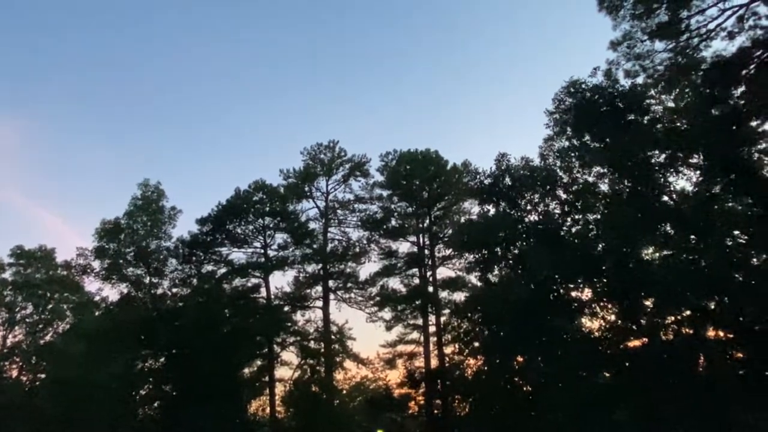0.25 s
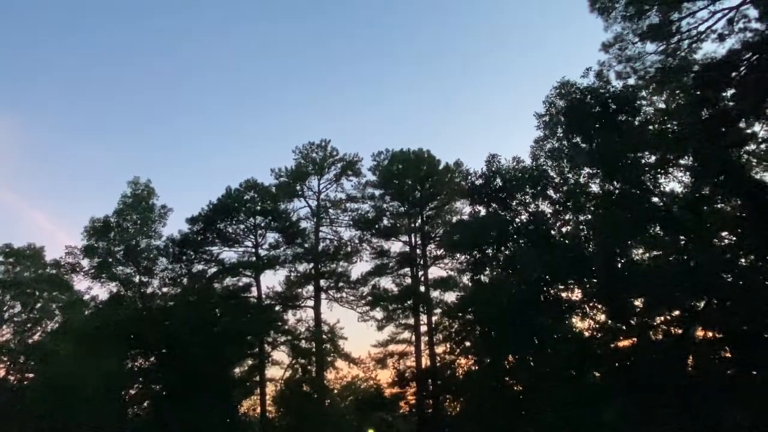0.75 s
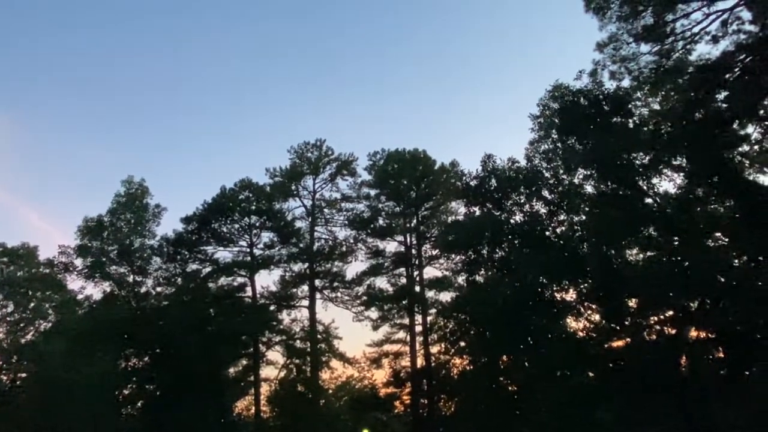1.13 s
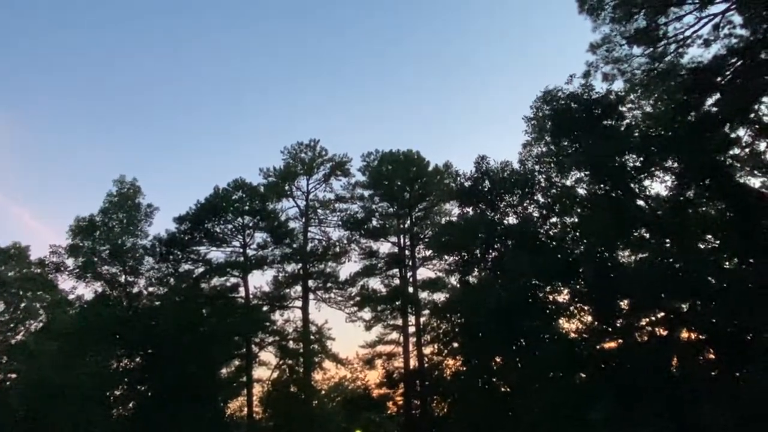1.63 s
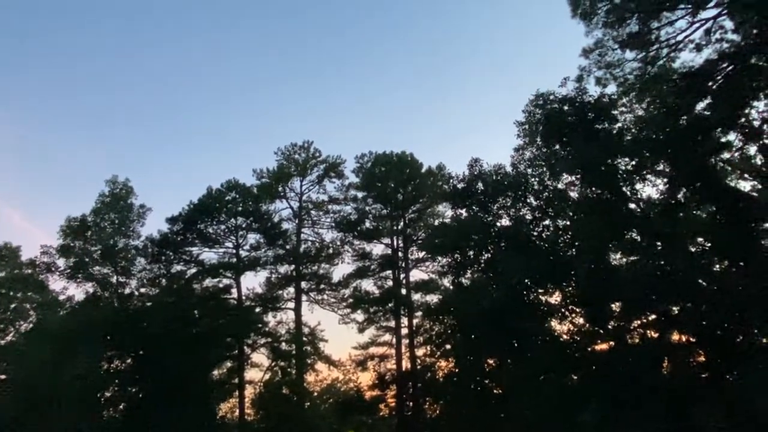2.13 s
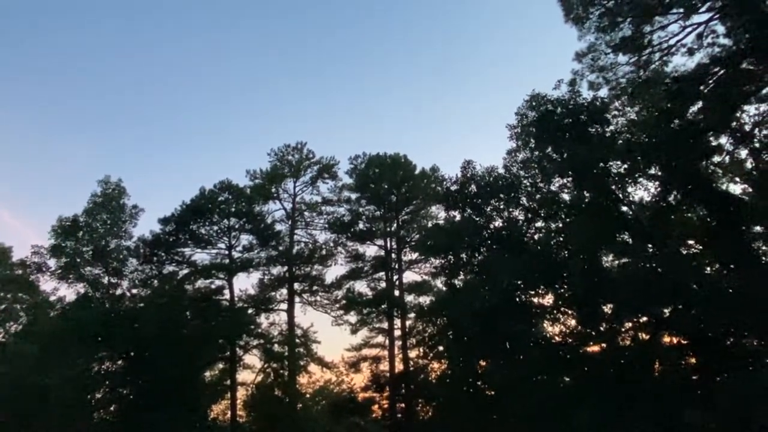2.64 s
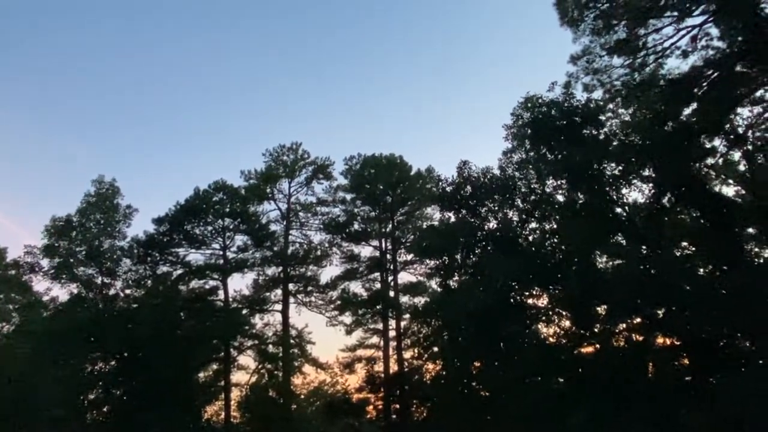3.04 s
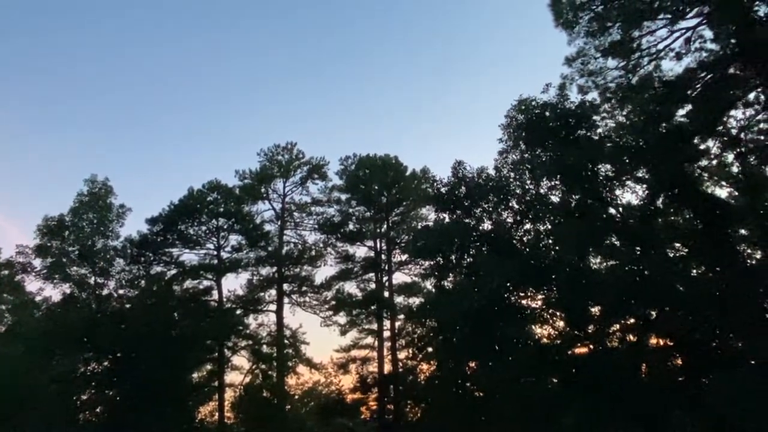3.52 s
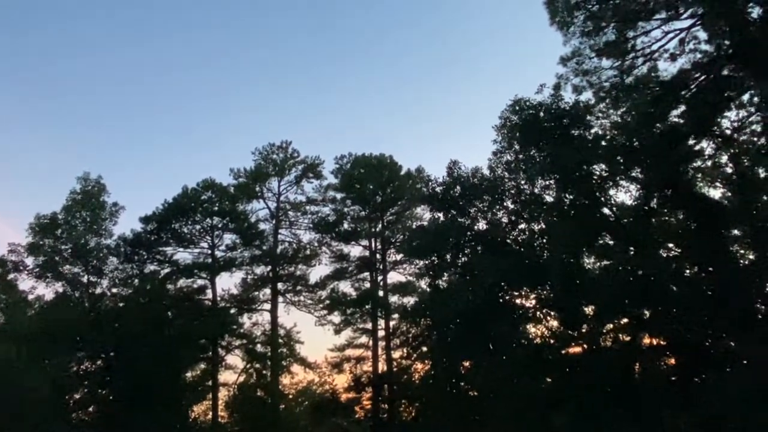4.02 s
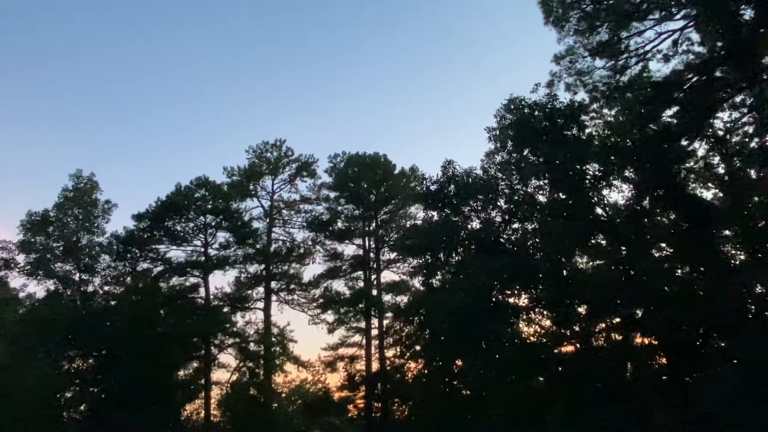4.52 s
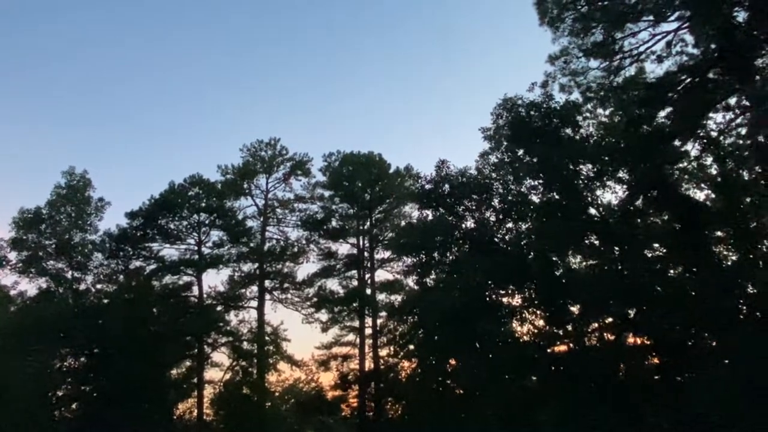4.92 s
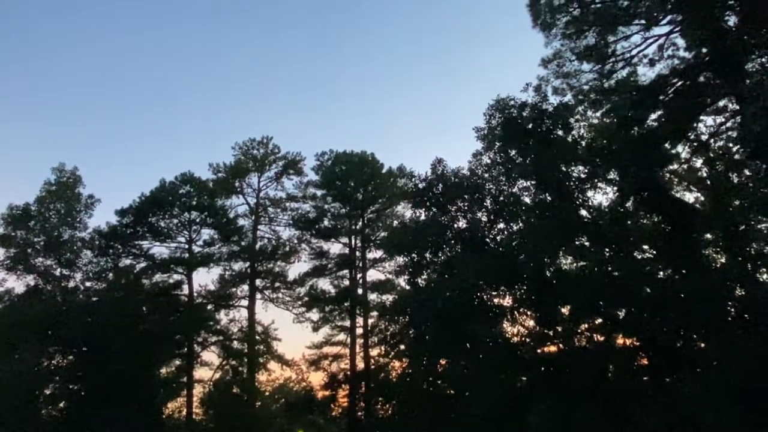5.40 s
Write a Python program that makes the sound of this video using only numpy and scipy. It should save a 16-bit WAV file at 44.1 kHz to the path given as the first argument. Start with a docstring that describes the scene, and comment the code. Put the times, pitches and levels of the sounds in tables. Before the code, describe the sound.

A fast-pulsing cicada buzzes over a dense, high hiss of far insects outdoors among trees. Wind thumps softly on the hand-held microphone early on. Then a choir of tree frogs builds to a loud, rapid bleating and stays there, joined by a katydid's faint, repeated rasps and more low wind bumps. Distant traffic and a slight hum lie underneath throughout.

```python
"""Dusk at the edge of a pine wood.

Heard through the two microphone ports of a hand-held phone. Far off, a chorus of insects sings steadily
over faint traffic and a machine hum. A katydid lisps with its wing file, one cicada throbs with its
tymbal, and the pulsing throats of tree frogs swell into a fast bleat. Puffs of wind bump the ports."""
import sys
import numpy as np
from scipy import signal
from scipy.fft import rfft, irfft, next_fast_len
from scipy.io import wavfile
from scipy.ndimage import uniform_filter1d, map_coordinates

SR = 44100
rng = np.random.default_rng(int(sys.argv[2]) if len(sys.argv) > 2 else 0)


def persist_wave(psi):
    """Save psi, clipped to +-1, as 16-bit WAV."""
    counts = np.round(np.clip(psi, -1, 1) * 32767).astype(np.int16)
    wavfile.write(sys.argv[1], SR, np.atleast_2d(counts).T)


N = 249606
TIME = np.arange(N) / SR
FFT_SIZE = next_fast_len(N + SR // 2)
HZ = np.arange(FFT_SIZE // 2 + 1) * SR / FFT_SIZE

# strength of the breeze at the microphone: (time [s], level [dB])
BREEZE_LEVELS = [(0, -60), (.45, -48.5), (.75, -57.5), (2.2, -59), (3.2, -55), (3.5, -53), (4.4, -52),
                 (4.65, -47.5), (4.85, -60.5), (5.1, -52), (5.45, -55.5), (5.66, -43)]


def undb(db):
    """Decibels to gain."""
    return np.exp(np.asarray(db) * np.log(10) / 20)


def unit(x):
    """Scaled to rms 1."""
    return x / np.sqrt(np.mean(x ** 2))


def curve(rows, at=TIME):
    """Rows of (time, value) joined by straight lines."""
    return np.interp(at, *np.transpose(rows))


def wander(rate_hz):
    """Random levels, each held about 1 / rate_hz seconds, smoothed twice; rms 1."""
    step = 64
    hold = int(SR / step / rate_hz)
    held = np.repeat(rng.standard_normal(N // step // hold + 2), hold)
    smooth = uniform_filter1d(uniform_filter1d(held, hold), hold)
    return unit(np.interp(np.arange(N) / step, np.arange(len(smooth)), smooth))


def noise(bins=len(HZ)):
    """Spectrum of white noise."""
    return rng.standard_normal(2 * bins).view(complex)


def to_samples(spectrum):
    """The waveform of a spectrum."""
    return irfft(spectrum, FFT_SIZE)[..., :N]


def resonance(hz, width, grid=HZ):
    """Response of a resonance applied twice: steep skirts."""
    return 1 / (1 + 1j * (grid ** 2 - hz ** 2) / (np.maximum(grid, 1) * width)) ** 2


def band_around(hz, width):
    """The stretch of the spectrum in which a resonance is still heard."""
    return slice(*np.searchsorted(HZ, [hz - 12 * width, hz + 12 * width]))


def left_lag(ms, grid=HZ):
    """Response that delays the left port by ms against the right."""
    return np.exp(-2j * np.pi * grid * np.array([[ms], [0]]) / 1000)


def clicks(rate_hz, jitter, scatter_db):
    """One click a cycle, each of its own size and early or late by about jitter of a cycle."""
    cycles = np.cumsum(rate_hz) / SR
    at = np.flatnonzero(np.diff(np.floor(cycles)))
    timing, size = rng.standard_normal((N // 64, 2))[:len(at)].T
    slip = (jitter * SR / rate_hz[at] * timing).astype(int)
    out = np.zeros(N)
    out[np.clip(at + slip, 0, N - 1)] = undb(scatter_db * size)
    return out


def trees(t60, wet_db):
    """Response of the wood: direct sound plus scatter off trunks and leaves, different at each port."""
    t = np.arange(SR // 2) / SR
    tail = rng.standard_normal((2, len(t))) * np.exp(-np.log(1000) * t / t60)
    return 1 + undb(wet_db) * rfft(tail / np.sqrt(np.sum(tail[0] ** 2)), FFT_SIZE)


def body(modes):
    """A singer's resonances at the two ports: their powers add, the strongest leads the phase."""
    total, power = np.zeros((2, len(HZ)), complex), np.zeros((2, len(HZ)))
    for k, (hz, width, left_db, right_db, lag_ms) in enumerate(modes):
        band = band_around(hz, width)
        ports = undb([[left_db], [right_db]]) * left_lag(lag_ms, HZ[band])
        mode = (-1) ** k * resonance(hz, width, HZ[band]) * ports
        total[:, band] += mode
        power[:, band] += abs(mode) ** 2
    return np.sqrt(power) * total / (abs(total) + 1e-12)


def traffic():
    """Distant traffic: a steady murmur from the right."""
    # spectrum of the murmur: (frequency [Hz], relative density [dB])
    murmur_spectrum = [(53, -41), (90, -7), (127, -6.5), (146, -15.5), (242, -13), (266, -13.5),
                       (462, -14.5), (1330, -19), (2400, -8), (3120, -45), (5280, -120)]
    hz, db = np.transpose(murmur_spectrum)
    colour = undb(np.interp(np.log(HZ + 1), np.log(hz), db, left=-90, right=-90))
    direct = .99 * noise() * left_lag(.33)
    diffuse = np.array([noise(), noise()])
    return undb(-58.5) * unit(to_samples(colour * (direct + diffuse)))


def machine_hum():
    """A faint machine whose tones waver together as its speed wanders."""
    # tones of the machine: (frequency [Hz], rms level [dB])
    tones = [(75, -67), (120.1, -64), (240.2, -77)]
    run_time = np.cumsum(1 + .006 * wander(18)) / SR
    return sum(np.sqrt(2) * undb(db + 2.5 * wander(9)) * np.sin(2 * np.pi * hz * run_time)
               for hz, db in tones)


def eddies(count=36):
    """Rows for small puffs at random moments, a little above the breeze, unequal at the two ports."""
    at = rng.random(count) * N / SR
    chance = rng.standard_normal((count, 4)).T
    left_db, right_db = curve(BREEZE_LEVELS, at) + 3.5 + 3 * chance[:2]
    hz = 69.9 * np.exp(.13 * chance[2])
    half_ms = 23 * np.exp(.3 * chance[3])
    fall_hz_per_ms = np.full(count, .8)
    return list(zip(at, left_db, right_db, hz, half_ms, fall_hz_per_ms))


def wind():
    """Puffs shove each microphone membrane for a cycle or two; a breeze rumbles between them."""
    # strong puffs on the ports: (centre [s], left peak [dB], right peak [dB], pitch [Hz],
    # half length [ms], fall of pitch [Hz/ms])
    strong_puffs = [(0.104, -32, -34.5, 70.4, 22, 1), (0.292, -31, -34.5, 66.5, 30, 1.1),
                    (0.428, -32, -35, 70, 20, -.3), (0.447, -22, -25, 94.4, 13, -.6),
                    (0.499, -38, -49, 59.5, 30, -0.7), (0.546, -39, -41, 59, 13, 0.9),
                    (0.6, -35, -37, 52, 30, 0), (0.628, -33, -37, 55, 22, .2),
                    (0.659, -29, -29.5, 60, 21, -.4), (0.697, -43, -44, 70, 20, .8),
                    (2.766, -43, -42, 66, 18, 1.2), (3.39, -41, -40.5, 105, 19, 1.5),
                    (3.415, -39, -39, 62, 36, .5), (3.466, -40, -42, 189.7, 9.1, 2.5),
                    (3.592, -45, -44, 114.6, 16, 1.5), (3.485, -27, -29, 70, 26.5, 1.4),
                    (3.714, -40.5, -43, 84.8, 29, 0.9), (4.021, -38.5, -41, 70.8, 35, 1),
                    (4.33, -40, -40, 52.2, 34, .3), (4.524, -35, -40, 95, 17, 1.4),
                    (4.567, -29.5, -32, 76, 15, 0.8), (4.593, -32.5, -34, 70.3, 18, .3),
                    (4.618, -35, -38, 62, 21, 1), (4.69, -42, -42, 61.8, 43, 0.5),
                    (5.0, -41, -44, 71.3, 51, 1.1), (5.368, -41, -38.5, 66, 24, .6),
                    (5.475, -41, -42, 56.8, 45, 0.2), (5.545, -32.5, -32, 72, 23, 0.5),
                    (5.565, -41, -41, 216, 22, 2), (5.603, -29, -26, 62.4, 32, .4)]
    puffs = strong_puffs + eddies()
    bumps, fronts = np.zeros((2, 2, N))
    for centre, left_db, right_db, hz, half_ms, fall in puffs:
        phase, skew = rng.standard_normal(2)
        span = slice(max(int((centre - .08) * SR), 0), min(int((centre + .08) * SR), N))
        t = TIME[span] - centre
        peak = undb([[left_db], [right_db]])
        envelope = np.exp(-2.4 * (t * 1000 / half_ms) ** 2)
        # mostly small quick eddies lead and large slow ones follow, so the pitch falls; where the fall is
        # negative the pitch rises instead
        turns = np.cumsum(np.maximum(hz - fall * t * 1000, hz / 3)) / SR + phase
        apart = np.array([[0], [.27 + .05 * skew]])  # about a quarter turn between the ports
        bumps[:, span] += peak * envelope * np.cos(2 * np.pi * (turns + apart))
        fronts[:, span] += peak * np.exp(-((t + .0078) / .0079) ** 2)
    flutter = unit(to_samples(noise() * resonance(136, 107) ** 2 * left_lag(1.2)))
    rumble = np.array([undb(wander(11)) * to_samples(noise() * resonance(59, 57.6)) for _ in range(2)])
    return bumps + undb(-16) * fronts * flutter + undb(curve(BREEZE_LEVELS)) * unit(rumble)


def insect_chorus():
    """Far insects, their strokes blurred to bands of noise, the highest a thin hiss."""
    # groups of bands: (left lag [ms], likeness of the ports [0-1], swell [dB/s], bands), each band
    # (pitch [Hz], width [Hz], starting level [dB], left minus right [dB])
    band_groups = [(-0.427, 0.59, 0., [(1732, 70, -78.5, -1), (2155, 37, -69, -3), (2244, 80, -59.5, 0.5),
                   (2440, 120, -59.5, 1.5), (2702, 110, -58.5, 2), (2840, 70, -62, -3)]),
                   (0.506, 0.53, 0.5, [(2983, 220, -60.5, 7), (3165, 90, -63, 4), (3370, 170, -55, 6.5),
                   (3510, 60, -61.5, 3), (3677, 100, -56.5, 2)]), (-0.398, 0.25, .5, [(3850, 160, -61, 2),
                   (3983, 120, -56.5, 4.5), (4247, 300, -55.5, 5), (4915, 390, -56, 4)]),
                   (-0.403, 0.47, -0.19, [(4495, 60, -62, 0), (4567, 300, -53, 2.5)]),
                   (-0.326, 0.21, 0.3, [(5330, 320, -52.5, 2), (5580, 210, -54, 5), (5920, 260, -53.5, 7.5),
                   (6235, 230, -51.5, 5.5), (6550, 60, -58, 8), (6545, 310, -50.5, 7), (6910, 250, -52, 3),
                   (7350, 430, -53.5, -3.5)]), (0.339, 0.41, 0., [(7710, 490, -55.5, -1.5),
                   (8140, 480, -61.5, 3), (8870, 930, -63, 2)]),
                   (0.2914, 1, 0.66, [(10230, 2200, -66.5, -.5), (12500, 810, -75, 0),
                   (13500, 1200, -77, 1), (14500, 1200, -74, 3), (15500, 1500, -73, -5)])]
    out = np.zeros((2, N))
    for lag_ms, likeness, swell, bands in band_groups:
        for hz, width, db, pan_db in bands:
            band = band_around(hz, width)
            grid = HZ[band]
            left, diffuse = noise(len(grid)), noise(len(grid))
            right = likeness * left + np.sqrt(1 - likeness ** 2) * diffuse
            ports = np.zeros((2, len(HZ)), complex)
            ports[:, band] = np.array([left, right]) * left_lag(lag_ms, grid) * resonance(hz, width, grid)
            pan = undb([[pan_db / 2], [-pan_db / 2]])
            level = undb(db + swell * TIME + .46 * wander(9))
            out += pan * level * unit(to_samples(ports))
    return out


def katydid(lisp_s=.092):
    """A katydid: short scrapes of the wing file that grow and stop."""
    # strokes of the file: (start [s], level [dB])
    lisps = [(2.435, -66), (3.105, -62), (3.585, -61), (3.925, -61), (4.34, -58.5), (4.713, -59.5),
             (5.17, -56.5), (5.587, -60.5)]
    # wing resonances: (frequency [Hz], width [Hz], relative level [dB])
    wing_modes = [(11200, 1200, -9), (13500, 1800, -1), (14900, 1600, 0)]
    stroke = [(-.3, 0), (.2, .6), (.8, 1.1), (1.05, .35), (1.6, 0)]  # (time [lisp lengths], gain)
    envelope = sum(undb(db) * curve(stroke, (TIME - start) / lisp_s) for start, db in lisps)
    wing = sum((-1) ** k * undb(db) * resonance(hz, width)
               for k, (hz, width, db) in enumerate(wing_modes))
    scrapes = envelope * unit(to_samples(noise() * wing))
    return to_samples(rfft(scrapes, FFT_SIZE) * left_lag(.285))


def cicada(throb_hz=38.2, click_hz=427.7):
    """One cicada in the trees: each squeeze of its tymbal buckles a run of ribs, a throb of clicks."""
    # body resonances: (frequency [Hz], width [Hz], left [dB], right [dB], left lag [ms])
    body_modes = [(4550, 800, -43.5, -47.5, -.4), (6900, 1300, -41, -39, -.3), (11800, 1000, -66, -66, .29)]
    phase = 2 * np.pi * throb_hz * (TIME - .0095) + .35 * wander(1.2)
    squeeze = np.exp(1.4 * (np.cos(phase) - 1))
    ribs = unit(clicks(np.full(N, click_hz), jitter=.06, scatter_db=3))
    rasp = .7 * rng.standard_normal(N)
    drive = unit((ribs + rasp) * squeeze * undb(1.2 * wander(1.5)))
    return to_samples(rfft(drive, FFT_SIZE) * body(body_modes) * trees(t60=.12, wet_db=-10))


def tree_frogs(full_voice_db=-40, pulse_hz=188.3):
    """Throat pulses quicken and rise as the call swells; near frogs ring clear of the farther crowd."""
    # swell of the choir: (time [s], level [dB])
    choir_levels = [(.6, -57), (1.2, -51.5), (2.3, -48.5), (2.9, -44.5), (3.3, -42.3), (3.65, -40.5),
                    (5.66, -40.5)]
    # throats with their ground echo: (frequency [Hz], width [Hz], left [dB], right [dB], left lag [ms])
    throat_modes = [(1914, 65, -25.5, -25, -0.31), (1999, 84, -28, -28, -0.33),
                    (2177, 84, -16.5, -19.5, -0.56), (2279, 56, -14.5, -13, -0.45),
                    (2331, 47, -14.5, -18, -0.51), (2401, 90, -11, -14.5, -0.43),
                    (2517, 60, -13, -12, -0.47), (2643, 68, -14, -19, -0.385),
                    (2715, 75, -12, -14.5, -0.43), (2860, 90, -13, -13, 0.287), (2920, 60, -9, -13, 0.15),
                    (2800, 59, -19, -20, .33), (3040, 51, -5.5, -9, 0.295), (3100, 57, -8, -7.5, 0.16),
                    (3242, 95, -6, -12, .18), (3310, 50, -10, -25, 0.268), (3456, 84, -12, -13, 0.158),
                    (3510, 61, -8, -12, 0.268), (3616, 65, -8.5, -9.5, 0.183), (3710, 63, -11.5, -18, 0.2),
                    (3780, 56, -10.5, -13, 0.15)]
    # narrow rings of the nearest callers: same columns
    near_modes = [(2445, 71, -13, -10, -0.454), (2963, 51, -2.5, -11, 0.198),
                  (3011, 49, -1.5, -10.5, 0.332), (3168, 76, -8, -10.5, 0.28), (3378, 45, -6, -13, 0.24),
                  (3570, 41, -4.5, -9, .2)]
    level_db = curve(choir_levels)
    below_full_db = np.maximum(full_voice_db - level_db, 0)
    rate_hz = pulse_hz - .3 * below_full_db + .8 * wander(14)
    pulses = unit(clicks(rate_hz, jitter=.016, scatter_db=1.5))
    crowd = .65 * rng.standard_normal(N) + .5 * rng.standard_normal((2, N))
    throb = wander(45)
    throb_db = 1.1 * (throb - uniform_filter1d(throb, size=SR // 12))  # the callers throb as one
    wood = trees(t60=.25, wet_db=-16)
    choir_drive = unit(.7 * pulses + crowd)
    near_drive = unit(pulses + .55 * rng.standard_normal(N))
    choir = to_samples(rfft(choir_drive, FFT_SIZE) * body(throat_modes) * wood)
    nearest = to_samples(rfft(near_drive, FFT_SIZE) * body(near_modes) * wood)
    calls = choir + nearest * undb(-.53 * below_full_db)
    slack_clock = np.cumsum(1 - .0005 * below_full_db)  # a slack throat runs its cycles more slowly
    calls = np.array([map_coordinates(port, [slack_clock], order=3) for port in calls])
    return calls / calls.mean(0).std() * undb(level_db + throb_db)


def scene():
    """The edge of the wood as it reaches the left and right port."""
    return insect_chorus() + tree_frogs() + cicada() + katydid() + wind() + traffic() + machine_hum()


def record(dry):
    """The phone cuts the deepest bass and the top."""
    low_cut = signal.butter(2, 28, "high", fs=SR, output="sos")
    high_cut = signal.ellip(14, .3, 70, 15740, fs=SR, output="sos")
    return signal.sosfilt(high_cut, signal.sosfilt(low_cut, dry))


dry = scene()
out = record(dry)
persist_wave(out)
```